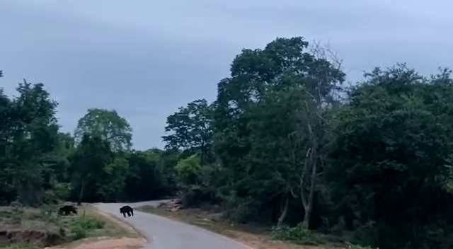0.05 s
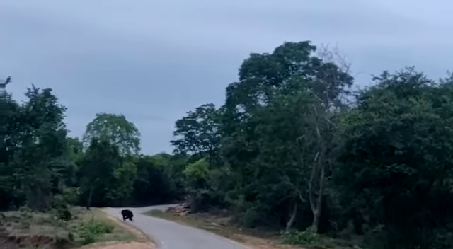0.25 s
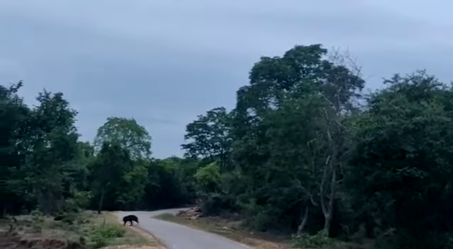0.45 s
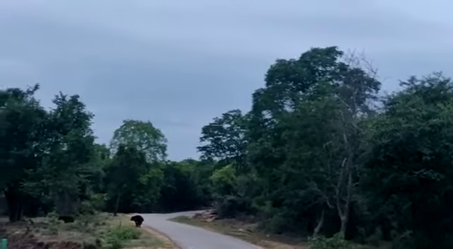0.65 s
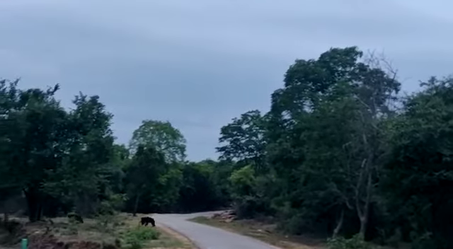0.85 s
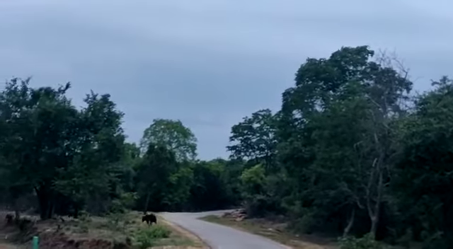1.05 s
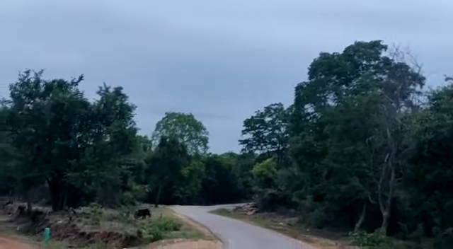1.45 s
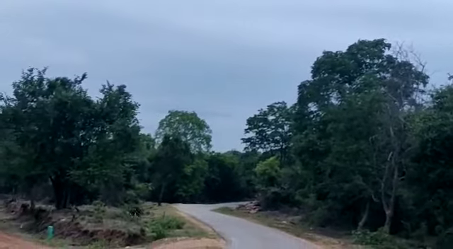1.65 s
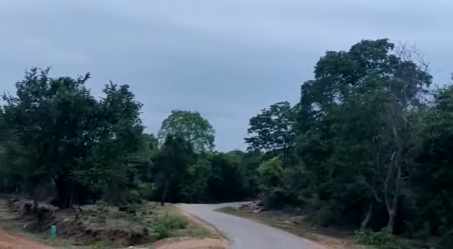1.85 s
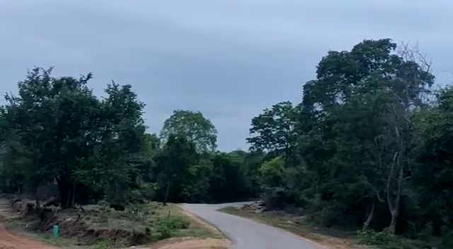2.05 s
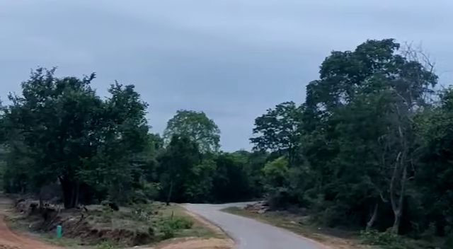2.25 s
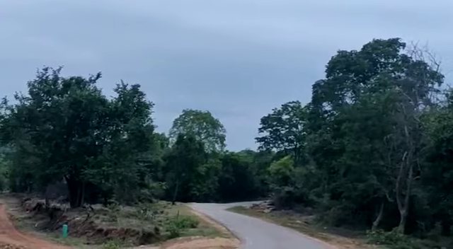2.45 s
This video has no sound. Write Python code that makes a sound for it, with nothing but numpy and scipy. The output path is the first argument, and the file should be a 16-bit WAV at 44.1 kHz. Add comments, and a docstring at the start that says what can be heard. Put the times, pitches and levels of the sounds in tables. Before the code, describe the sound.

A bear wails twice beside a forest road, each call arching in pitch and breaking into a croak, the second fainter. A soft moan precedes each. The calls echo among trees over faint cricket chirps and forest hiss.

```python
"""Beside a forest road a bear wails twice; the echo of an earlier call fades at the start, softer moans answer
and a low hum joins the first wail. Each wail is a harmonic series, nearly a pure tone, whose pitch arches and
then collapses into a croak. Scattering among the trees returns the calls as reverberation for over a second. A
cricket stridulates over the faint hiss of the forest and distant insects, with small ticks close by."""
import sys
import numpy as np
from scipy import signal
from scipy.fft import rfft, irfft
from scipy.io import wavfile
from scipy.ndimage import uniform_filter1d

SR = 44100
rng = np.random.default_rng(int(sys.argv[2]) if len(sys.argv) > 2 else 0)


def dump_mix(stems):
    """Bounce the given channels to the path in sys.argv[1] as a 16-bit WAV at rate SR."""
    frames = np.atleast_2d(stems).T  # one column per channel
    limited = np.clip(frames, -1, 1)  # hard clip at full scale
    pcm = np.round(limited * 32767).astype(np.int16)
    wavfile.write(sys.argv[1], SR, pcm)


N = 110250
T = np.arange(N) / SR

# Hoarse moments of the voice: centre_s, half_length_s, noise_db, pitch_jitter_share
HOARSE_MOMENTS = [(0.23, 0.046, -65.5, 0), (0.715, 0.018, -54, .004), (0.805, 0.038, -48, .004),
                  (1.795, 0.025, -62, .018), (2.131, 0.014, -51, .012), (2.24, 0.029, -57, .006)]


def voice(times_s, pitch_hz, levels_db, fade_db_per_s, sink_s=0.0333, drop_db=12):
    """Periodic vibration: harmonics share one pitch, which collapses as the tone dies at its end."""
    # Throat resonances from the fifth harmonic up: frequency_hz, gain_db
    throat = [(2400, -7.5), (2900, -8), (3550, -7.5), (4150, -9), (4700, -9), (5300, -14), (6000, -27),
              (6600, -14), (7100, -19), (7650, -27.5), (8300, -22), (9400, -46.5)]
    # Shrill moments, lifting the harmonics above an edge: centre_s, half_length_s, boost_db, edge_hz
    shrill_moments = [(0.377, 0.087, 13.5, 5900), (.59, 0.04, 7.5, 5900), (0.663, .025, 7, 4000),
                      (1.81, .03, 5, 4000)]
    floor_hz, flutter_db, shimmer_db, overtone_fade_db_per_s = 176.7, 0.5, 4, 300
    after_s = np.maximum(T - times_s[-1], 0)
    sinking_s = np.maximum(T - times_s[-1] + 0.004, 0)  # the pitch gives way just before the level
    pitch = floor_hz + (np.interp(T, times_s, pitch_hz) - floor_hz) * np.exp(-sinking_s / sink_s)
    jitter = 0.00423 + sum(share * bump(s, half) for s, half, _, share in HOARSE_MOMENTS)
    pitch = uniform_filter1d(pitch, 300) * (1 + jitter * wander(200) + 0.0033 * wander(37))
    phase = 2 * np.pi * np.cumsum(pitch) / SR
    levels = [np.interp(T, times_s, level) for level in levels_db]
    tone = np.zeros(N)
    for k, level in enumerate(levels[:4], 1):
        loss_db = (k > 1) * overtone_fade_db_per_s * after_s  # overtones die first
        tone += amp(level + flutter_db * wander(70) - loss_db) * np.sin(k * phase)
    if len(levels) > 4:  # a fifth level sets the treble, harmonics 5 to 16
        flares = [(db * bump(s, half), edge) for s, half, db, edge in shrill_moments]
        for k in range(5, 17):
            shrill_db = sum(flare for flare, edge in flares if k * pitch_hz.max() > edge)
            treble_db = levels[4] + at_hz(throat, k * pitch) + shrill_db + shimmer_db * wander(27)
            tone += amp(treble_db - fade_db_per_s * after_s) * np.sin(k * phase)
    onset = np.clip((T - times_s[0]) / 0.0026 + 1, 0, 1)
    ending_db = -fade_db_per_s * after_s - drop_db * (1 - np.exp(-after_s / 0.0072))
    return np.sqrt(2) * tone * onset * amp(ending_db) * np.exp(-(after_s / 0.11) ** 6)


def wails():
    """Frequency modulation: two loud calls each glide along an arch of pitch."""
    # Wail contours: time_s, pitch_hz, harmonic_1_db to harmonic_4_db, treble_db
    first_wail = [(0.15, 442.4, -50.5, -48.5, -66.5, -77, -68), (0.168, 485.4, -35, -47, -55, -81, -59),
                  (0.196, 497, -23, -33.5, -41.5, -54, -81), (0.234, 533.8, -23.5, -38, -35, -60, -69),
                  (0.254, 532.2, -25.5, -33.5, -41, -82, -67.5),
                  (0.282, 538.9, -23.5, -34.5, -40.5, -53.5, -72),
                  (0.352, 573.2, -27.5, -31.5, -52, -63.5, -58),
                  (0.364, 576.5, -28, -35, -46.5, -55.5, -57), (0.466, 590.8, -34, -41, -52, -59.5, -61),
                  (0.526, 585, -35, -46.5, -47.5, -60, -58.5), (0.576, 590, -31, -41, -53, -56.5, -58),
                  (0.592, 596, -29, -46, -58, -65, -58), (0.608, 595, -26.5, -47, -46, -51.5, -56),
                  (0.64, 581.5, -25, -48.5, -48, -75.5, -62.5), (0.656, 582.6, -26.5, -40, -50.5, -56, -61),
                  (0.718, 561, -22, -42, -47, -49.5, -61.5), (0.755, 541, -20.5, -44, -49, -55, -58),
                  (0.769, 538, -17.3, -44, -54, -64, -59), (0.785, 525, -21, -37, -54, -68, -60)]
    second_wail = [(1.645, 455, -52, -80, -75, -78, -76), (1.661, 467.2, -49.5, -65, -65, -80, -74),
                   (1.697, 510, -37.5, -69, -53, -65, -69), (1.737, 537, -35, -57, -50, -70, -67),
                   (1.783, 531, -38.5, -51, -53, -61, -66), (1.875, 581, -43, -46.5, -59.5, -58, -62.5),
                   (1.959, 599, -42, -48, -54, -52.5, -60), (2.001, 591, -41, -54, -51, -63, -68),
                   (2.045, 587, -40, -60, -62, -59, -64), (2.107, 578, -36, -51, -57, -55, -61.5),
                   (2.121, 586, -32, -54, -70, -62, -68), (2.135, 590, -35, -54, -55, -66, -70),
                   (2.175, 570, -31, -55, -64, -62, -69), (2.191, 540, -31, -68, -49, -59, -68),
                   (2.222, 520, -31, -47, -66, -71, -73)]
    contours = map(np.transpose, (first_wail, second_wail))
    return sum(voice(s, hz, levels, fade_db_per_s=442) for s, hz, *levels in contours)


def croaks():
    """Register break: each wail closes in a low, fluttering tone that sinks away."""
    # Low notes: start_s, length_s, pitch_hz, level_db
    breaks = [(0.796, 0.015, 325, -30), (2.235, .015, 335, -42)]
    slope_db_per_octave, flutter_depth = -14, 0.18
    out = np.zeros(N)
    for start, length, hz, db in breaks:
        levels = [np.full(2, db + slope_db_per_octave * np.log2(k)) for k in range(1, 5)]
        tone = voice([start, start + length], [hz, hz], levels, fade_db_per_s=219.5)
        out += tone * (1 + flutter_depth * wander(150))
    return out


def rasp(wail):
    """Turbulence: air noise follows the wails' envelope and flares where the voice turns hoarse."""
    # Spectra of breath and of hoarseness: frequency_hz, gain_db
    air_spectrum = [(150, -17), (500, -11.5), (1500, -2.5), (2300, -5), (3000, -3.5), (4500, -0.5),
                    (6600, -8.5), (8500, -5), (10000, -38.5)]
    hoarse_spectrum = [(100, -23), (350, 0), (1100, 1), (1400, -7), (1750, -2), (2200, -7), (3000, -18),
                       (4600, -4), (6500, -12), (8500, -24), (10000, -45)]
    effort = abs(uniform_filter1d(wail ** 2, 900)) ** 0.5
    air = amp(-37.5) * effort.max() * (effort / effort.max()) ** 0.55 * noise(air_spectrum)
    flares = sum(amp(db) * bump(s, half) for s, half, db, _ in HOARSE_MOMENTS)
    return spread(air + flares * noise(hoarse_spectrum), mid=0.64, side=0.5)


def moans():
    """Weak voicing: the first table holds a faint tone of four harmonics, the fading echo of an earlier call,
    that runs into a soft moan; the second holds a later soft call that rises a little, swells and sinks away."""
    # Moan contours: time_s, pitch_hz, harmonic_1_db to harmonic_4_db
    first_moan = [(0, 436, -56, -68, -64, -80), (.07, 428, -57, -67, -63, -69),
                  (.14, 436, -58, -68, -66, -66), (.2, 450, -48, -64, -64, -74),
                  (.236, 440, -41, -68, -62, -76)]
    second_moan = [(1.2, 315, -58, -82, -84, -88), (1.228, 402, -55, -77, -74, -82),
                   (1.25, 421, -50, -72, -74, -80), (1.305, 432, -53, -77, -73, -66),
                   (1.345, 445, -46, -78, -61, -75), (1.369, 434, -46, -80, -61, -66)]
    out = np.zeros(N)
    for s, hz, *levels in map(np.transpose, (first_moan, second_moan)):
        release = np.exp(-(np.maximum(T - s[-1], 0) / 0.06) ** 4)
        out += voice(s, hz, levels, fade_db_per_s=130, sink_s=0.048, drop_db=0) * release
    return out


def hum():
    """Superposition: a low, nearly steady tone on its own fundamental lies under the first wail."""
    # Hum contour: time_s, pitch_hz, level_db
    contour = [(.425, 267.8, -75), (.455, 252.4, -43.5), (.54, 243.4, -43.5), (.63, 249, -45.5),
               (.7, 261, -46), (.78, 262, -48.5), (.81, 256.2, -47.5)]
    # Harmonics 1 to 3: gain_db
    harmonics_db = [-3, -7, -20]
    s, hz, db = np.transpose(contour)
    phase = 2 * np.pi * np.cumsum(np.interp(T, s, hz)) / SR
    tone = sum(amp(level) * np.sin(k * phase) for k, level in enumerate(harmonics_db, 1))
    return np.sqrt(2) * tone * amp(np.interp(T, s, db)) * (T > s[0]) * (T < s[-1])


def tree_scatter(calls):
    """Diffuse reverberation: the trees scatter many echoes, each band dying at its own rate."""
    # Reverberation time: frequency_hz, t60_s
    decay_times = [(200, 0.97), (550, 1.93), (1200, 1.96), (2400, 1.4), (6000, 0.36)]
    # Echo spectrum: frequency_hz, gain_db
    echo_spectrum = [(150, -15), (330, -7), (470, -3), (580, 3), (800, 1), (1170, 6.5), (1400, 0),
                     (1600, 1), (1790, 14.5), (2400, 7), (2900, -2), (6000, 1)]
    # Left-right likeness: frequency_hz, coherence
    likeness = [(300, 0.99), (600, 0.66), (1200, 0.17), (2400, 0.27), (6000, .1)]
    echoes_per_s, build_s, echo_db = 1500, 0.024, -18.3
    taps = rng.standard_normal((2, 2 * SR)) * (rng.random(2 * SR) < echoes_per_s / SR)
    hz, t, bands = signal.stft(unit(taps), SR, nperseg=512)
    coherence = np.clip(at_hz(likeness, hz), 0, 1)[:, None]
    bands[1] = coherence * bands[0] + np.sqrt(1 - coherence ** 2) * bands[1]
    decay = amp(-60 * t / at_hz(decay_times, hz)[:, None]) * (1 - np.exp(-t / build_s))
    energy = (decay ** 2).mean(1, keepdims=True) * 2 * SR
    decay *= amp(at_hz(echo_spectrum, hz))[:, None] / np.sqrt(energy)
    response = signal.istft(bands * decay, SR, nperseg=512)[1]
    return amp(echo_db) * signal.fftconvolve(calls[None], response, axes=1)[:, :N]


def tree_lines(calls, cutoff_hz=900):
    """Discrete reflection: the tree lines return two delayed, low-passed copies."""
    # Reflections: delay_s, gain_db
    returns = [(.135, -31), (.34, -37)]
    delays = lambda f: sum(amp(db) * np.exp(-2j * np.pi * f * s) for s, db in returns)
    return shaped(calls, lambda f: delays(f) / (1 + (f / cutoff_hz) ** 4))


def lingering_echo(fade_db_per_s=60):
    """Reverberant decay: the blurred harmonics of an earlier call die away among the trees."""
    # Noise bands: centre_hz, level_db
    harmonics = [(510, -53.5), (990, -54.5), (1420, -56.5)]
    tail = sum(amp(db - fade_db_per_s * T) * band(hz, width_oct=0.08) for hz, db in harmonics)
    return spread(tail, mid=0.88, side=0.4)


def cricket():
    """Stridulation: each chirp is a swelling run of wing strokes, every stroke gliding down a little."""
    # Chirps: start_s, level_db
    chirps = [(0.104, -55.5), (.345, -55), (0.596, -55.5), (0.844, -56), (1.075, -56.5), (1.327, -59),
              (1.583, -58), (1.824, -59.5), (2.052, -59), (2.287, -57.5)]
    carrier_hz, glide_hz, jitter_hz, strokes_per_s, chirp_s = 5560, 230, 40, 76, 0.091
    out = np.zeros(N)
    for start, db in chirps:
        progress = np.clip((T - start) / chirp_s, 0, 1)
        swell = (progress > 0) * (progress < 1) * (0.65 + 0.51 * np.minimum(2 * progress, 1))
        stroke = (T - start) * strokes_per_s % 1
        pulses = np.sin(np.pi * stroke ** 0.92) ** 2.1
        pitch = carrier_hz + jitter_hz * wander(90) - glide_hz * (stroke - 0.5)
        out += amp(db) * swell * pulses * np.sin(2 * np.pi * np.cumsum(pitch) / SR)
    return out


def ticks():
    """Damped transients: small dry snaps close by, each a burst of noise around a resonance."""
    # Snaps: start_s, level_db, ring_hz, decay_s
    snaps = [(0.023, -50, 2220, 0.018), (0.026, -54, 6100, 0.0089), (0.1142, -46.5, 6850, 0.0053)]
    return sum(amp(db) * (T > s) * np.exp(-abs(T - s) / decay) * band(hz, width_oct=0.137, skirt=0.51)
               for s, db, hz, decay in snaps)


def distant_insects():
    """Narrow-band noise: its random beating gives the waver of faint, high trills."""
    # Trills: centre_s, half_length_s, level_db
    trills = [(.06, .04, -75), (.6, .03, -70), (1.0, .05, -76), (1.23, .03, -70), (1.35, .03, -71),
              (1.94, .07, -73), (2.48, .04, -75)]
    return sum(amp(db) * bump(s, half) for s, half, db in trills) * band(6430, width_oct=0.02)


def forest_air(level_db=-56.5, flicker_db=0.75):
    """Ambient noise: low air rumble and forest hiss, partly coherent between left and right."""
    # Ambient spectrum: frequency_hz, gain_db
    ambient_spectrum = [(20, 7.5), (50, -1), (100, -10), (170, -12.5), (330, -12.5), (450, -6),
                        (750, -22.5), (1400, -22.5), (2000, -23), (3000, -21.5), (4000, -20.5), (5200, -18),
                        (6000, -23), (7150, -17.5), (7700, -28), (8300, -21), (9000, -25.5), (9600, -33.5),
                        (12500, -30.5), (15500, -34.5)]
    # Left-right likeness: frequency_hz, coherence
    likeness = [(30, 0.052), (120, .4), (500, 0.44), (1500, 1), (3000, 0.1), (8000, 0.043)]
    left, independent = noise(ambient_spectrum)
    coherence = lambda f: np.clip(at_hz(likeness, f), 0, 1)
    right = shaped(left, coherence) + shaped(independent, lambda f: np.sqrt(1 - coherence(f) ** 2))
    return np.array([left, right]) * amp(level_db + flicker_db * wander(25))


def amp(db):
    """Decibels as an amplitude ratio."""
    return 10 ** (np.asarray(db) / 20)


def unit(x):
    """Normalisation to rms 1."""
    return x / np.sqrt(np.mean(x ** 2) + 1e-20)


def at_hz(points, hz):
    """Interpolation of a table on a log-frequency axis."""
    f, value = np.transpose(points)
    return np.interp(np.log(hz + 1), np.log(f + 1), value)


def shaped(x, gain):
    """Linear filtering: the spectrum of x is multiplied by gain(frequency)."""
    size = 2 * x.shape[-1]
    return irfft(rfft(x, size) * gain(np.fft.rfftfreq(size, 1 / SR)), size)[..., :size // 2]


def noise(spectrum):
    """Two channels of coloured noise."""
    return unit(shaped(rng.standard_normal((2, N)), lambda f: amp(at_hz(spectrum, f))))


def band(hz, width_oct, skirt=0):
    """Two channels of band-pass noise: a Gaussian peak on an optional broad skirt."""
    peak = lambda f: np.exp(-0.5 * (np.log2((f + 1) / hz) / width_oct) ** 2)
    return unit(shaped(rng.standard_normal((2, N)), lambda f: peak(f) + skirt * (f > 700) * (f < 9000)))


def wander(rate_hz):
    """Random modulation: low-pass noise with rms 1."""
    f = np.fft.rfftfreq(N, 1 / SR)[:2000]
    spectrum = rng.standard_normal(len(f)) + 1j * rng.standard_normal(len(f))
    return unit(irfft(spectrum * np.exp(-(f / rate_hz) ** 2), N))


def bump(centre_s, half_s):
    """A Gaussian envelope of height 1."""
    return np.exp(-0.5 * ((T - centre_s) / half_s) ** 2)


def spread(pair, mid, side):
    """Mid-side mixing: one signal reaches left and right in phase, the other in antiphase."""
    return mid * pair[0] + side * pair[1] * np.array([[1], [-1]])


def scene():
    """Superposition of the bears, their echoes, the insects and the forest air."""
    # Level sent into the trees, the later calls being farther off: time_s, gain_db
    echo_feed = [(.8, -1), (1.6, 7)]
    # Phase difference between the microphones: frequency_hz, left_lead_rad
    phase_lead = [(60, 0), (300, .1), (600, .2), (1200, .6), (1900, 1.0), (2400, .9), (2930, -.7),
                  (5500, 1.8), (8400, .1)]
    wail = wails()
    bears = wail + hum() + moans() + croaks() + rasp(wail)
    into_trees = bears[0] * amp(np.interp(T, *np.transpose(echo_feed)))
    animals = bears + tree_scatter(into_trees) + tree_lines(into_trees) + cricket()
    animals[1] = shaped(animals[1], lambda f: np.exp(-1j * at_hz(phase_lead, f)))
    return animals + ticks() + lingering_echo() + forest_air() + distant_insects()


def record(dry):
    """Frequency response: the two microphones differ in colour and share one band limit."""
    # Level difference: frequency_hz, left_minus_right_db
    balance = [(60, 2.5), (300, 5), (600, 4.5), (1200, 5.5), (1750, 5), (2350, 13), (3300, 1), (4500, 0),
               (5500, 3.5), (6400, 19.5), (7400, -3), (8600, -4.5), (10000, 0.5)]
    cutoff_hz = 15700
    pair = shaped(dry, lambda f: amp(at_hz(balance, f) * np.array([[0.5], [-0.5]])))
    low_pass = signal.firwin(511, cutoff_hz, window=("kaiser", 9), fs=SR)
    return signal.oaconvolve(pair, low_pass[None], "same")


dry = scene()
out = record(dry)
dump_mix(out)
```